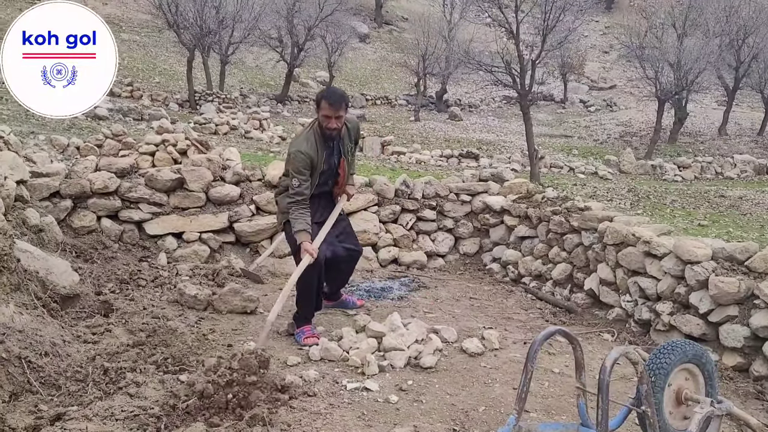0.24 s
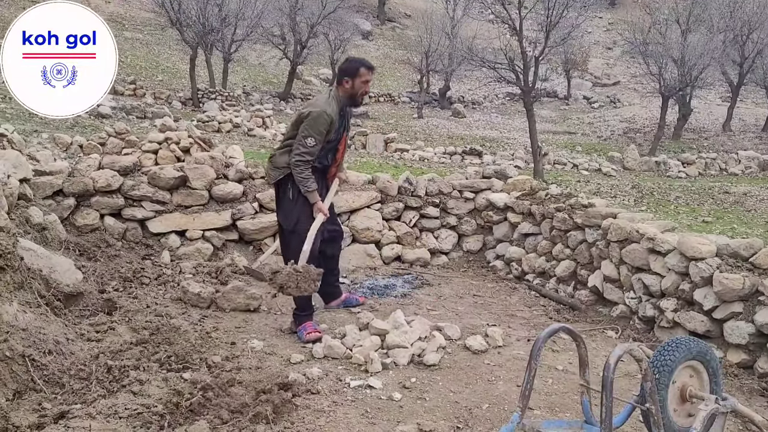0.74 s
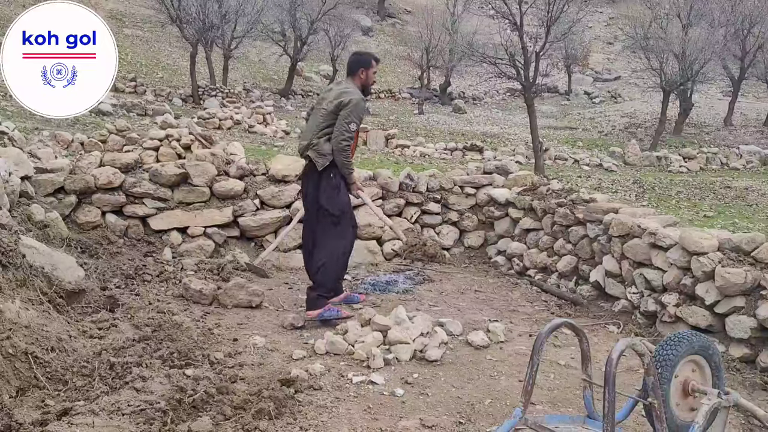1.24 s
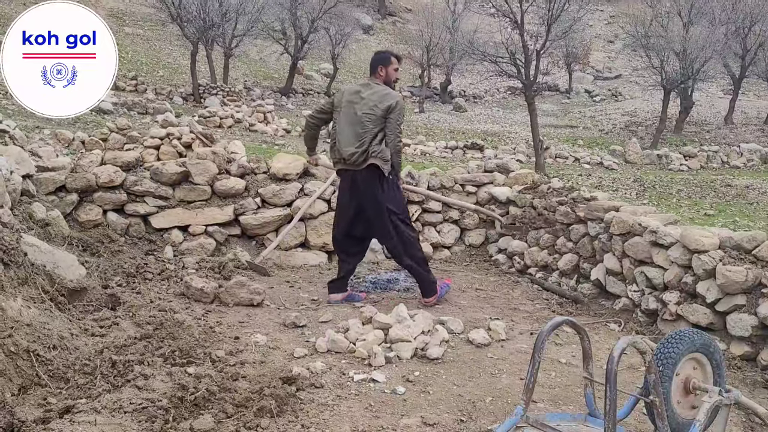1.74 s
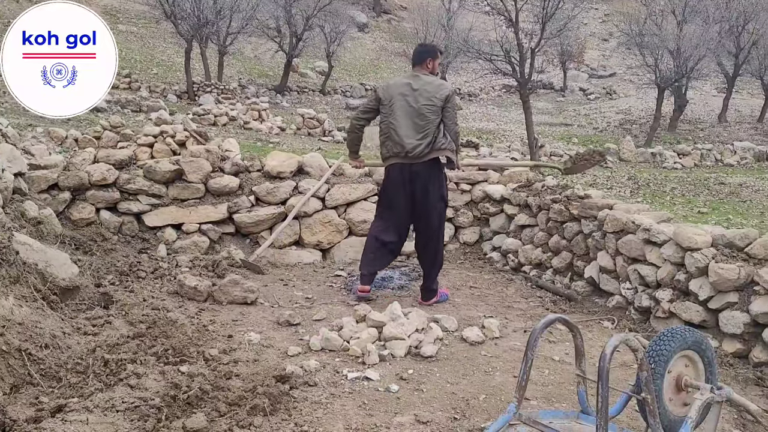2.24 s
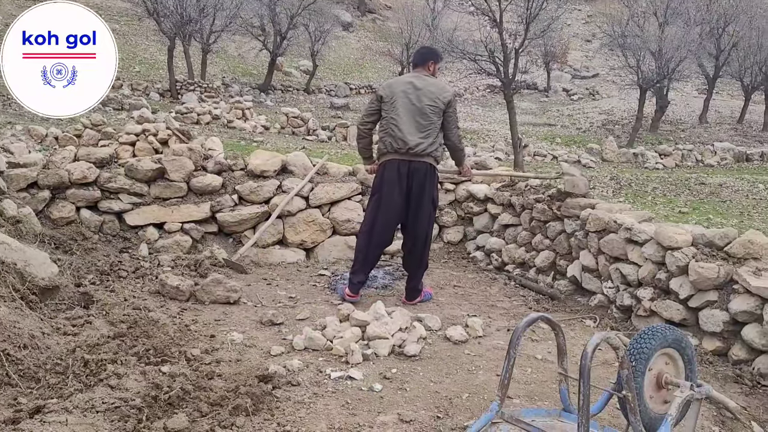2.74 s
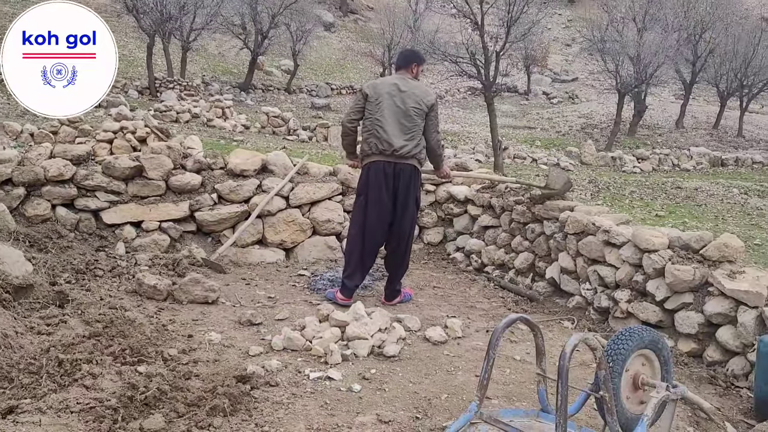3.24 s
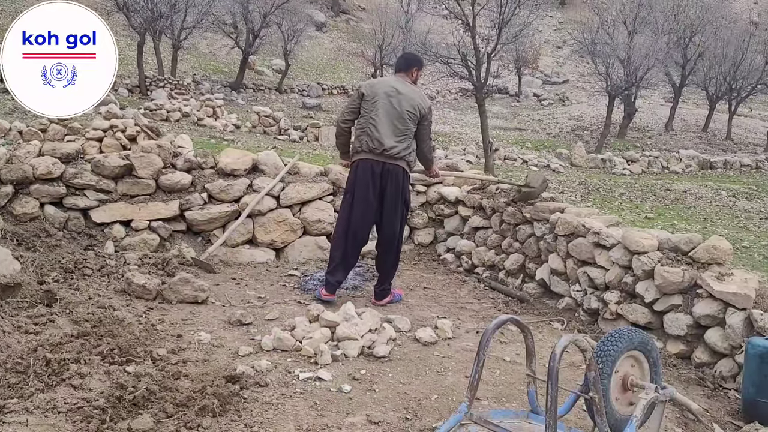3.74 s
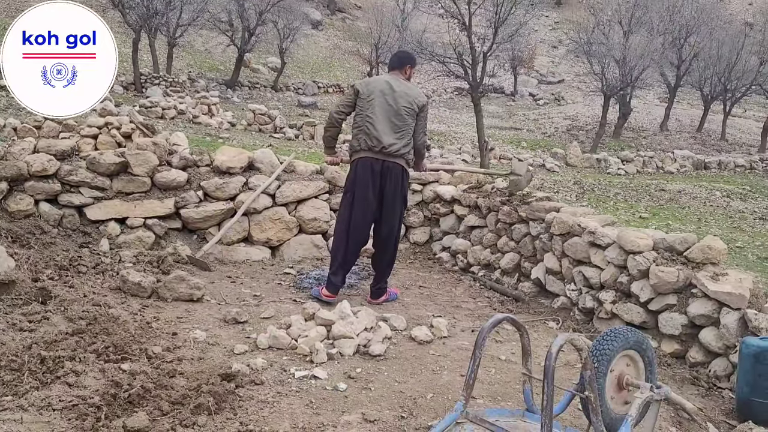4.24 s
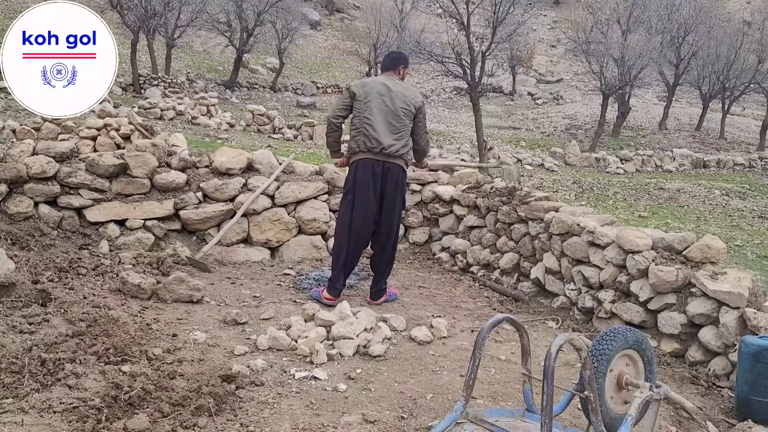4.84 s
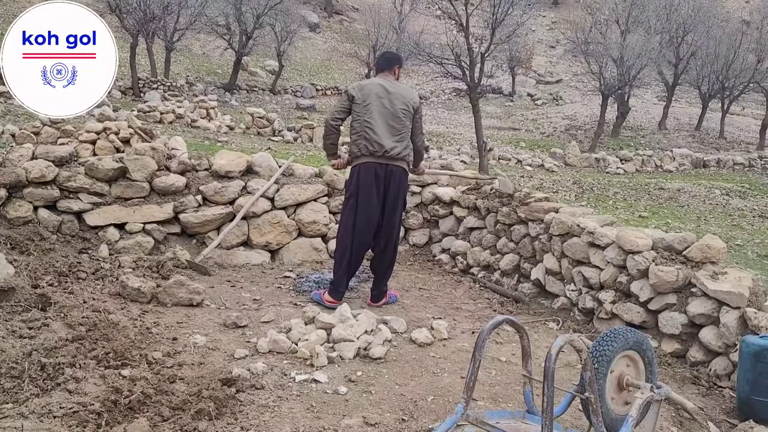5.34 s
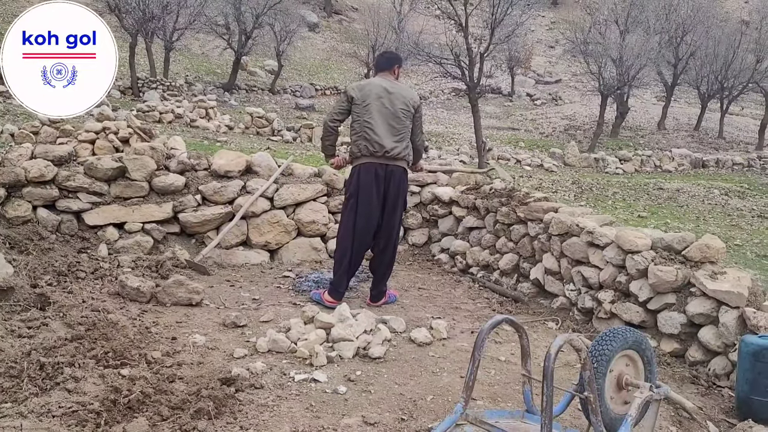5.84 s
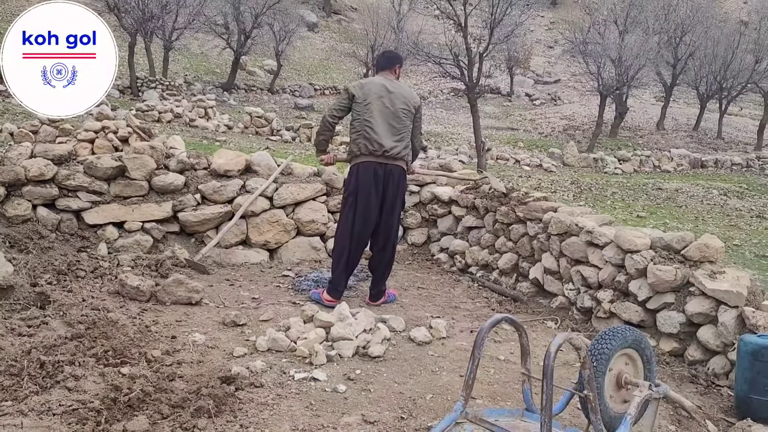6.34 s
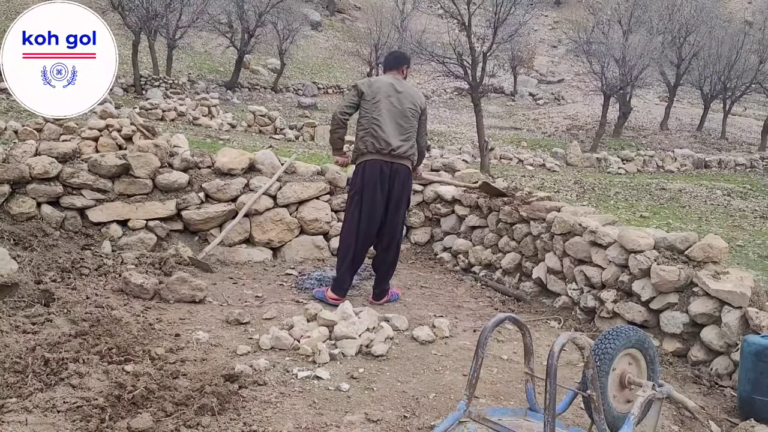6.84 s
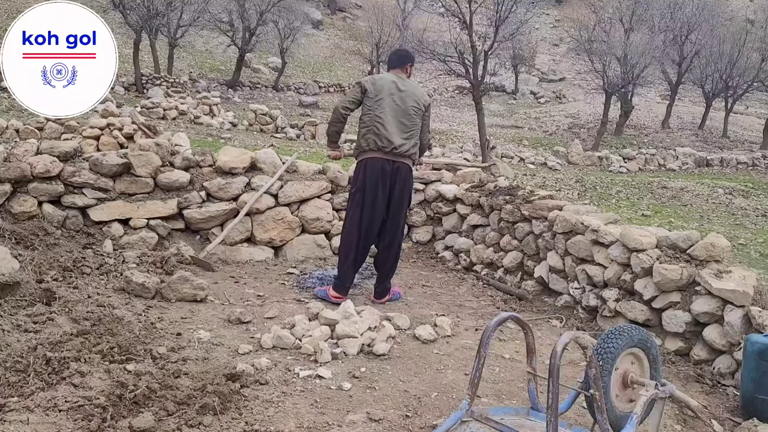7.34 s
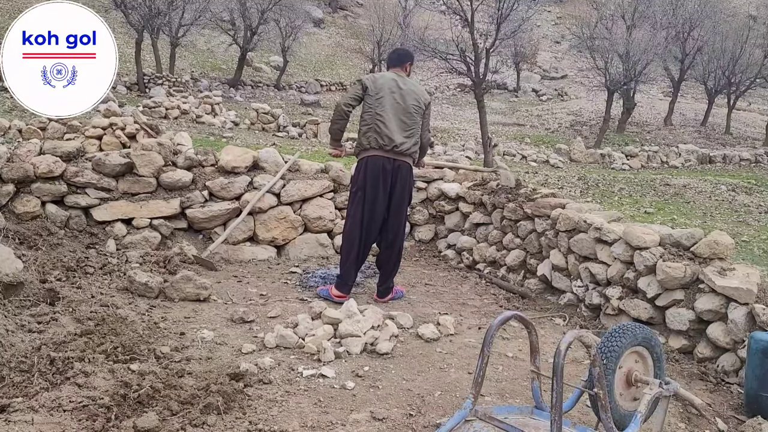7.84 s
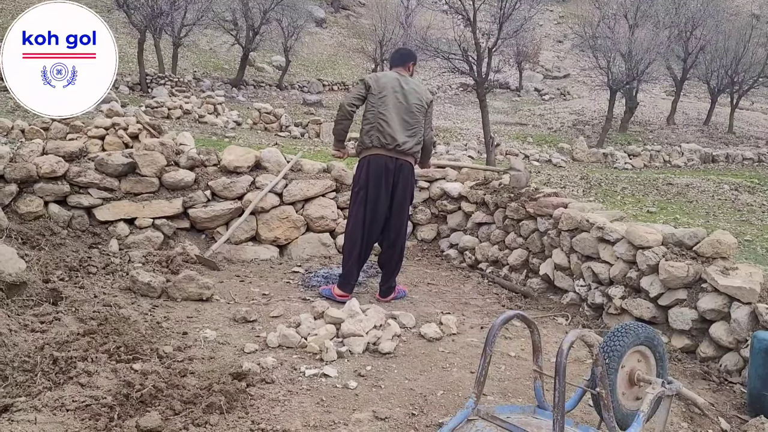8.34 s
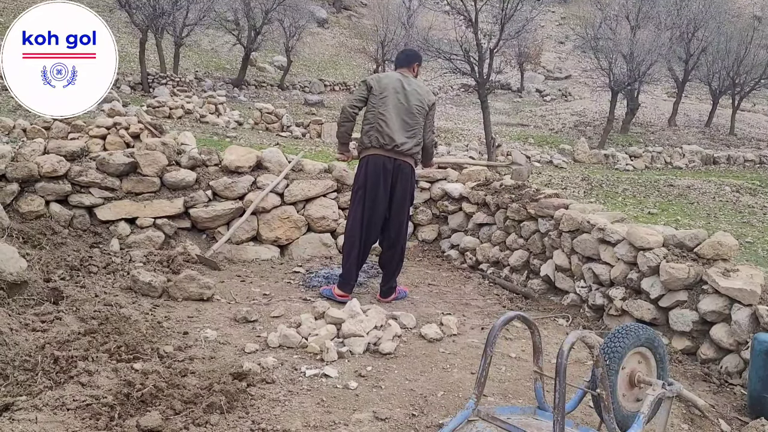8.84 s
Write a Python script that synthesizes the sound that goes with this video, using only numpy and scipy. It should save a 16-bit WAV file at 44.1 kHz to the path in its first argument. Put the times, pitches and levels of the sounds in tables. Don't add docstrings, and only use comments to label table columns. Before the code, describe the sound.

Close, dry stereo pickup of shovel work at a stone wall: low knocks and faint rustles of cloth and soil, then separate damped steel clanks with stone crunch, varying from barely audible brushes to two very loud hits. Crumbs patter after one heavy blow. Between hits it is almost quiet, with a low distant traffic drone, soft hum, light wind bumps, weak bird whistles and one faint falling hoot. Only a dull, faint echo from the slope.

```python
import sys
import numpy as np
from scipy import signal
from scipy.fft import rfft, irfft, next_fast_len
from scipy.io import wavfile

SR = 44100
rng = np.random.default_rng(int(sys.argv[2]) if len(sys.argv) > 2 else 0)


def elevation(decibels):
    levels = np.asarray(decibels, float)
    return 10 ** (levels / 20)


def dump(signal):
    limited = np.clip(np.atleast_2d(signal).T, -1, 1)
    pcm = np.round(limited * 32767).astype(np.int16)
    wavfile.write(sys.argv[1], SR, pcm)


N = 400428

# t/s, peak level/dB, then low, middle and top register against the bright one, level/dB
TIP_HITS = [
    (8.4806, -2, -3, -1, -16.5),
    (8.5528, -36, -6, -10, -16),
]
# t/s, peak level/dB, low, middle, top level/dB
FLAT_HITS = [
    (5.1701, -3.5, -3.5, 0.92, -2.5),
]
# t/s, peak level/dB, low, middle, top level/dB
HEEL_HITS = [
    (7.5678, -29, 2.5, 0.32, -6.5),
]
# t/s, peak level/dB, low, middle, top level/dB
DRAG_HITS = [
    (6.8026, -15, 5.8, 6.6, -8),
]
# t/s, peak level/dB, low, middle, top level/dB
TAP_HITS = [
    (4.546, -23.5, -3.5, -0.58, -7),
]
# t/s, peak level/dB, low, middle, top level/dB
SIDE_HITS = [
    (2.6326, -11.5, -2.6, 5.2, -5.5),
]
# t/s, peak level/dB, low, middle, top level/dB
SCRAPE_HITS = [
    (3.4517, -21.5, -10.5, -4, -8.5),
    (3.461, -31, -10.5, -5.5, -3),
    (3.473, -28.5, -6, -5, -9.5),
    (3.4794, -48, 4, -9, -8),
    (3.503, -35.5, -12, -5.5, -8),
    (3.524, -41.5, -1, -5.5, -8),
]
# t/s, peak level/dB, low, middle, top level/dB
CORNER_HITS = [
    (7.506, -28, -7.5, -1.2, -4.5),
]
# t/s, peak level/dB, low, middle, top level/dB
BRUSH_HITS = [
    (6.1147, -41, 0, 10, -1.5),
]
# t/s, peak level/dB, low, middle, top level/dB
BACK_HITS = [
    (5.682, -29, 4, 2.9, -8.5),
]

# f/Hz, level/dB, T60/s
TIP_HZ = [417, 537, 827, 947, 1160, 1562, 1717, 1987, 2159, 2310, 2433, 3051, 4170, 4400]
TIP_DB = [0.5, -14.5, -9, -5, -7, -8.5, -2.5, -9, -7, -9, -1, -9.5, -14, -13]
TIP_T60_S = [0.14, .07, 0.041, 0.062, .07, 0.0774, .09, 0.094, 0.1, 0.0792, 0.055, .09, .06, 0.1]
# f/Hz, level/dB, T60/s
FLAT_HZ = [426, 772, 924, 1029, 1179, 1455, 2170, 2438, 2900, 3530, 4170, 5850, 6590, 7400]
FLAT_DB = [0, -7.5, -1, -3.5, -7.5, -3.5, -8.5, -9, -17, -11, -13, -16, -17.5, -16.5]
FLAT_T60_S = [0.072, 0.056, 0.059, .065, 0.097, .05, .055, 0.055, .06, .06, 0.05, 0.071, 0.16, 0.022]
# f/Hz, level/dB, T60/s
DRAG_HZ = [235, 512, 765, 1021, 1600, 2121, 2250, 2400, 2545, 2922, 3597, 4132, 4470, 6120]
DRAG_DB = [-5.5, 5.5, 3, -3.5, -6, -8, -16, -14, -21, -24, -24, -22, -21, -25]
DRAG_T60_S = [0.1, 0.056, 0.055, 0.063, 0.069, 0.073, 0.1, .07, 0.11, .055, .075, 0.094, .065, .06]
# f/Hz, level/dB, T60/s
SIDE_HZ = [232, 438, 537, 814, 939, 1035, 1190, 1497, 1758, 2147, 2450, 3083, 4150, 6900]
SIDE_DB = [-11, -6.5, -11.5, -1.5, 4, 1, -3, -3, -12, -8, -10, -9, -19, -30]
SIDE_T60_S = [.08, 0.059, .07, 0.098, 0.068, .07, 0.19, 0.1, 0.068, .075, .07, 0.056, .065, .07]
# f/Hz, level/dB, T60/s
SCRAPE_HZ = [409, 802, 1120, 1790, 2280, 2450, 2640, 2920, 3310, 4040, 4950, 6340]
SCRAPE_DB = [0.5, -9, -1, -8, 0, 1.5, -4, 1, -8, -0.5, -22, -18.5]
SCRAPE_T60_S = [0.094, .06, 0.028, 0.12, 0.038, 0.026, 0.051, 0.0324, 0.052, 0.041, .04, 0.059]
# f/Hz, level/dB, T60/s
HEEL_MODES = [(228, 1.5, .09), (322, -1.5, 0.074), (425, 4, 0.064), (790, -8, 0.067), (918, -4.5, 0.11),
              (1156, -10, 0.05), (1673, 2.5, 0.1), (2140, -5, 0.082), (2515, 1, 0.061), (3420, -30, 0.052),
              (4150, -4, 0.042), (7130, -18, 0.029)]
# f/Hz, level/dB, T60/s
TAP_MODES = [(433, -10.5, 0.12), (917, 2.5, 0.037), (1460, -6.5, 0.032), (2300, -10, 0.1),
             (2400, 14.5, 0.0088), (2510, -11, 0.12), (3540, -4, 0.09), (4120, -23, .06), (5259, -20, .06),
             (6240, -22, 0.064), (7250, -39, 0.041)]
# f/Hz, level/dB, T60/s
CORNER_MODES = [(685, 1, 0.037), (921, -10, 0.1), (1503, -9, 0.069), (2000, -26, .08), (2200, -1, 0.042),
                (2370, -13, 0.056), (3600, -24.5, .06), (5410, -0.5, 0.04), (7251, -25, 0.035)]
# f/Hz, level/dB, T60/s
BRUSH_MODES = [(400, -13, .06), (1077, 2.5, 0.034), (2500, -10.5, 0.092), (3060, -8, 0.08),
               (4500, -18, .05), (5630, -8, 0.034), (7580, -16, 0.075)]
# f/Hz, level/dB, T60/s
BACK_MODES = [(228, -3, 0.077), (422, -1, 0.11), (508, -6.5, 0.085), (615, 0, 0.051), (794, -2, 0.044),
              (1182, -8.5, 0.05), (1480, -8, 0.079), (1700, -0.5, 0.027), (2145, -6.5, 0.11),
              (4240, -18, 0.086), (7320, -33, 0.047)]
# f/Hz, level/dB, T60/s
CRUNCH = [(273, -15, 0.075), (452, -11.5, 0.075), (610, -14, 0.11), (773, -9.5, 0.052), (1230, -7.5, .07),
          (1676, -10, 0.095), (2830, -9, 0.086), (3640, -3, 0.012), (5100, -22, 0.012),
          (8370, -25.5, 0.037), (12200, -27, 0.061)]
REGISTER_EDGES_HZ = [200, 600, 1500]

# t/s, peak level/dB, f/Hz
DEBRIS = [
    (5.244, -43, 3100),
    (5.257, -50, 1700),
    (5.2762, -53, 2980),
    (5.283, -55, 5500),
    (5.3, -48, 3100),
    (5.308, -51.5, 4300),
    (5.318, -50, 3220),
    (5.333, -54, 4200),
    (5.352, -60, 3600),
    (5.372, -64, 2900),
]
# t/s, peak level/dB
THUDS = [
    (2.636, -36.5),
    (5.174, -35.5),
    (5.686, -48),
    (6.808, -35),
    (8.484, -36),
]
# t/s, peak level/dB, f/Hz, T60/s, broad snap level/dB
KNOCKS = [
    (0.571, -26, 294, 0.055, -38),
    (3.137, -19.5, 1070, 0.0083, -34),
    (3.148, -43.5, 950, 0.038, -25),
    (3.657, -48, 591, 0.28, -29),
    (4.39, -52, 562, 0.28, -34),
    (4.74, -55, 644, 0.3, -38),
    (6.538, -42.5, 312, 0.13, -40),
    (8.356, -34, 459, 0.029, -33),
]
# t/s, peak level/dB, f/Hz,
# broad snap level/dB
TOUCHES = [(0.286, -59.5, 1680, -8), (0.5497, -62, 1900, 2.5), (1.227, -46, 1210, -10),
           (1.239, -60, 2400, 1), (1.685, -53, 1580, -10.5), (1.778, -56, 1660, -11),
           (1.935, -65, 1450, 4.5), (2.105, -68.5, 6600, -23.5), (2.171, -72.5, 5540, 17.5),
           (2.3494, -71, 6590, -9.5), (2.384, -63.5, 6100, -21), (2.4, -57, 1180, -0.5),
           (2.448, -64, 7700, -20), (2.46, -67, 6800, -20), (2.4846, -74.5, 2940, 21),
           (2.4846, -80, 3150, -25), (2.576, -71, 3980, -23), (2.6063, -49.5, 2140, -3),
           (2.706, -59, 3060, -6), (3.0422, -51, 1560, -10), (3.043, -58, 4000, -9.5), (3.55, -53, 2550, 0),
           (3.705, -48.5, 2060, -2), (4.085, -68, 1610, 3), (6.099, -68.5, 6900, 8), (8.069, -75, 2110, 8),
           (8.933, -58, 1540, -4.5)]
# t/s, peak level/dB, f/Hz, T60/s, broad snap level/dB
TICKS = [
    (.286, -68, 7340, .04, -14),
    (.552, -57, 11500, .025, -7),
    (.575, -54.5, 7200, 0.036, -3),
    (3.583, -65, 7000, 0.016, -2),
    (3.671, -50, 11600, 0.01, -2),
    (3.697, -66, 11600, .05, 10),
    (3.7295, -46.5, 12000, 0.029, 0.5),
]
# f/Hz, side against mid level/dB, side phase/rad
PORTS = [(120, -20, -1.9), (300, -13, -1.9), (650, -11, -1.7), (1300, -3, -2.0), (2600, -3, -1.9),
         (5000, -3.5, -1.2), (9000, 0, -1.4), (13000, 0, -1.8)]
# delay/s, level/dB, smear/s
ECHOES = [
    (0.031, -27.5, 0.022),
    (0.068, -36.5, 0.014),
    (.11, -42, .05),
    (0.159, -69, 0.03),
]

# t/s, length/s, grit level/dB, cloth level/dB
MOVES = [(0.303, 0.24, -85, -74.5), (0.464, 0.45, -86, -96), (0.6, 0.23, -77.5, -64),
         (0.726, 0.13, -94, -88), (1.146, 0.15, -81, -83), (1.24, 0.04, -84, -68), (1.76, 0.47, -80, -102),
         (1.998, 1, -98.5, -78), (2.462, 0.23, -78.5, -73), (2.697, 0.1, -100, -70),
         (3.07, 0.06, -71.5, -71), (3.251, 0.089, -71.5, -68.5), (3.332, 0.098, -79, -88),
         (3.43, 0.27, -69, -71), (3.543, 0.066, -71, -68), (3.732, 0.094, -70, -65.5),
         (4.22, 0.87, -89, -81.5), (4.36, 0.093, -88, -78.5), (4.551, 0.061, -52.5, -61),
         (5.286, 0.13, -81, -76.5), (5.34, 0.19, -68.5, -83.5), (6.12, 0.39, -94, -84),
         (7.537, 0.34, -85, -92), (8.067, 0.14, -80.5, -78), (8.564, 0.23, -79, -91),
         (8.947, 0.2, -101, -83)]
# f/Hz, level/dB per Hz
GRIT = [(1180, -32), (2000, 0), (3040, 1), (3460, -10.5), (4020, -3), (6000, -20.5), (7800, -51),
        (13200, -120)]
# f/Hz, level/dB per Hz
CLOTH = [(2940, -40), (4600, -17.5), (5800, -7.5), (6900, 0), (7800, -5.5), (9000, -14.5), (10400, -4.5),
         (12000, -3), (15200, -6.5), (16000, -12)]
# t/s, length/s, level/dB, left-right level/dB
GUSTS = [(0.658, 0.25, -69, -4), (0.885, 0.11, -48.5, 37), (1.067, 0.19, -69, -11), (1.257, 0.21, -92, 2),
         (1.58, 0.063, -52.5, 24), (1.834, 0.062, -74, 9), (2.04, 0.049, -51, 14), (2.403, 0.22, -76, 4),
         (6.192, 0.057, -72, -9), (7.194, 0.084, -60.5, -22), (7.27, 0.16, -59, -16), (7.587, 0.13, -72, 6),
         (7.714, 0.039, -43.5, -33), (7.808, 0.099, -43, -30.5), (7.926, 0.029, -54.5, -22),
         (8.19, 0.066, -69, 5), (8.693, 0.077, -68.5, -4), (9.07, 0.18, -75, -5.5)]
# start t/s, end t/s, first f/Hz, last f/Hz, level/dB
NOTES = [(1.535, 1.612, 3540, 3580, -87), (1.994, 2.083, 3570, 3540, -89), (2.48, 2.552, 3560, 3400, -80),
         (3.84, 3.959, 2670, 3100, -89), (3.955, 4.06, 2300, 3000, -82), (4.185, 4.268, 3570, 3550, -86),
         (4.415, 4.535, 2660, 3150, -86), (3.778, 3.8, 2800, 2150, -65.5), (4.17, 4.19, 4500, 3600, -75),
         (3.965, 3.995, 3300, 4600, -78), (4.318, 4.338, 4500, 3600, -75), (4.462, 4.482, 4500, 3700, -76),
         (0.2, 0.219, 4270, 3570, -81), (0.322, 0.35, 4400, 3500, -76), (1.1, 1.144, 4160, 3500, -87),
         (1.472, 1.5, 3220, 3170, -67.5), (1.499, 1.52, 2660, 2400, -65.5), (3.766, 3.793, 4880, 3800, -78),
         (3.74, 3.81, 3520, 3620, -84), (3.765, 3.785, 2800, 3350, -72), (1.465, 1.506, 6700, 6300, -80),
         (4.688, 4.758, 3570, 3580, -85), (5.41, 5.57, 3150, 3000, -89)]
# t/s, f/Hz, level/dB
HOOT = [
    (5.271, 390, -50),
    (5.297, 360, -54.5),
    (5.318, 329, -46),
    (5.38, 270, -55),
    (5.42, 262.5, -45),
    (5.471, 242, -63),
]
# t/s, length/s, rush level/dB, high hum level/dB
PASSES = [(0.505, .25, -78, -82), (0.653, 0.42, -79, -62.5), (1.799, 0.35, -79, -69),
          (2.447, 0.17, -76, -96), (3.1, 0.81, -76.5, -90.5), (3.605, 0.68, -77, -91.5),
          (4.55, 0.34, -75.5, -95), (5.449, .4, -79, -90.5), (7.608, 0.37, -81.5, -85.5),
          (8.621, 0.19, -69, -81), (8.81, 0.43, -75, -82.5), (8.992, .8, -73, -67)]
# t/s, length/s, level/dB
HUM_SWELLS = [(0.01, 1.1, -64), (.78, 1.17, -67.5), (2.22, 0.93, -70.5), (3.56, 0.68, -65),
              (4.47, 0.65, -67), (5.31, 1.12, -73), (6.0, 1.4, -73.5), (6.9, 1.4, -73), (7.74, 0.43, -63.5),
              (8.3, 1.1, -79.5)]
# t/s, level/dB
VALLEY = [
    (0.0, -63.5),
    (7.89, -65),
    (9.08, -64),
]
# f/Hz, level/dB per Hz
FAR_DRONE = [(21, -43), (36, -18), (60, -12), (96, -7), (213, -0.5), (327, 0), (369, -4), (725, -15.5),
             (912, -12.5), (1000, -15), (1220, -28), (1400, -33), (1820, -63), (3080, -120)]
# f/Hz, level/dB per Hz
RUSH = [(710, -42.5), (1200, -3), (1370, -10), (1540, -2), (1940, 5), (2600, -13), (3000, -31.5),
        (4160, -55.5), (7040, -120)]
# f/Hz, left-right likeness/1
LIKENESS = [(60, 1), (130, 1), (290, 0.77), (640, 0.41), (1410, 0.13), (3100, 0.23), (6820, 0.43),
            (15000, 0.8)]


def steel_ring(t, modes):
    settled = np.maximum(t - .04, 0)
    chance = rng.standard_normal((len(modes), 2))
    ring = np.zeros(len(t))
    for (hz, level_db, t60), (level_chance, pitch_chance) in zip(modes, chance):
        decay_db = 60 * (t + .8 * settled) / min(t60, .1)
        tone = np.sin(2 * np.pi * hz * (1 + 0.00053 * pitch_chance) * t)
        ring += elevation(level_db + 0.88 * level_chance - decay_db) * tone
    return ring


def stone_crunch(t, white, crunch_db, grind_s):
    slowed = 0.3 * t + 1.6 * np.maximum(t - grind_s, 0)
    first_crack = elevation(crunch_db - 12.5 - 60 * t / 0.0087) * band(white, 1100, 17000)
    crunch = first_crack
    for hz, level_db, t60 in CRUNCH:
        grinding = rms_one(band(white, hz / 1.27, hz * 1.27))
        crunch = crunch + elevation(crunch_db + level_db - 60 * slowed / t60) * grinding
    return crunch


def earth_spray(t, white, spray_db):
    clusters = signal.lfilter([1], [1, -.99], (np.abs(white) > 2.75) * 1.0)
    grains = rms_one(band(white[::-1] * (.5 + clusters), 1600, 6000))
    return elevation(spray_db - 60 * t / 0.41) * np.minimum(t / 0.018, 1) * (1 - 4 * t) * grains


def blade(blows, modes, air_db, crunch_db, chatter, grind_s, edge_hz, dull_hz, spray_db, push_db, rise_s):
    out, t = np.zeros(N), np.arange(SR // 4) / SR
    edges = REGISTER_EDGES_HZ + [edge_hz, 7500, 12800]
    for s, peak_db, low_db, middle_db, top_db in blows:
        white = rng.standard_normal(len(t))
        ring = steel_ring(t, modes)
        ring = ring + chatter * np.interp(t - .0062, t, ring)
        sound = ring + stone_crunch(t, white, crunch_db, grind_s)
        sound = sound * np.minimum(t / max(rise_s, .0002), 1)
        shares_db = (low_db, middle_db, 0, top_db, top_db + air_db)
        sound = sum(elevation(share_db) * rms_one(band(sound, low_hz, high_hz))
                    for share_db, low_hz, high_hz in zip(shares_db, edges, edges[1:]))
        sound = signal.lfilter([1], [1, -np.exp(-2 * np.pi * dull_hz / SR)], sound)
        first_push = np.sin(2 * np.pi * np.minimum(t / .0005, 1))
        sound = sound / np.abs(sound).max() + elevation(push_db) * first_push
        sound = sound + earth_spray(t, white, spray_db)
        add(out, elevation(peak_db) * sound / np.abs(sound).max(), s + 0.0015)
    return out


def all_blows():
    tip = np.transpose([TIP_HZ, TIP_DB, TIP_T60_S])
    flat = np.transpose([FLAT_HZ, FLAT_DB, FLAT_T60_S])
    side = np.transpose([SIDE_HZ, SIDE_DB, SIDE_T60_S])
    scrape = np.transpose([SCRAPE_HZ, SCRAPE_DB, SCRAPE_T60_S])
    drag = np.transpose([DRAG_HZ, DRAG_DB, DRAG_T60_S])
    blows = blade(TIP_HITS, tip, air_db=0.0, crunch_db=0.0, chatter=0.053, grind_s=0.022,
                  edge_hz=2440, dull_hz=7885, spray_db=-58, push_db=1.0, rise_s=0.00039)
    blows += blade(FLAT_HITS, flat, air_db=-2.5, crunch_db=-1.2, chatter=0.3, grind_s=0.011,
                   edge_hz=3700, dull_hz=7060, spray_db=-43.5, push_db=-4.0, rise_s=0.00068)
    blows += blade(HEEL_HITS, HEEL_MODES, air_db=-0.27, crunch_db=1.7, chatter=0.37, grind_s=0.011,
                   edge_hz=3700, dull_hz=13500, spray_db=-44, push_db=-38, rise_s=0.0056)
    blows += blade(SIDE_HITS, side, air_db=-9.0, crunch_db=-5.5, chatter=0.13, grind_s=0.018,
                   edge_hz=2650, dull_hz=13500, spray_db=-50.5, push_db=2.0, rise_s=0.00068)
    blows += blade(SCRAPE_HITS, scrape, air_db=-3.0, crunch_db=0.0, chatter=0.12, grind_s=0.015,
                   edge_hz=3980, dull_hz=8970, spray_db=-41.5, push_db=-1.5, rise_s=0.00038)
    blows += blade(DRAG_HITS, drag, air_db=-3.5, crunch_db=-8.0, chatter=0.14, grind_s=0.025,
                   edge_hz=3650, dull_hz=15130, spray_db=-50.0, push_db=-22, rise_s=0.0031)
    blows += blade(TAP_HITS, TAP_MODES, air_db=-3.4, crunch_db=-0.6, chatter=0.23, grind_s=0.018,
                   edge_hz=2620, dull_hz=15000, spray_db=-39, push_db=-29, rise_s=0.00046)
    blows += blade(CORNER_HITS, CORNER_MODES, air_db=-5.0, crunch_db=-1.6, chatter=0.85, grind_s=0.012,
                   edge_hz=2630, dull_hz=12000, spray_db=-40, push_db=-23, rise_s=0.0016)
    blows += blade(BRUSH_HITS, BRUSH_MODES, air_db=-5.5, crunch_db=-2.0, chatter=0.23, grind_s=0.029,
                   edge_hz=3200, dull_hz=12000, spray_db=-38, push_db=-14, rise_s=0.00079)
    blows += blade(BACK_HITS, BACK_MODES, air_db=-1.5, crunch_db=-5.5, chatter=0.59, grind_s=0.024,
                   edge_hz=3560, dull_hz=12900, spray_db=-43, push_db=-30, rise_s=0.0024)
    return blows


def small_hits(rows, width):
    out, t = np.zeros(N), np.arange(SR // 8) / SR
    for s, peak_db, hz, t60, snap_db in rows:
        white = rng.standard_normal(len(t))
        tone = rms_one(band(white, hz / width, hz * width))
        snap = elevation(snap_db) * rms_one(band(white, 800, 24000))
        decay = elevation(peak_db - 4 - 60 * t / max(t60, .004))
        add(out, decay * (tone + snap) * np.minimum(t / 0.0025, 1), s)
    return out


def touches_and_falls():
    touches = [(s, peak_db, hz, 0.042, snap_db) for s, peak_db, hz, snap_db in TOUCHES]
    thuds = [(s, peak_db, 61.94, 0.28, -60) for s, peak_db in THUDS]
    debris = [(s, peak_db - 4.5, hz, 0.038, -19) for s, peak_db, hz in DEBRIS]
    hits = small_hits(touches, 1.36) + small_hits(KNOCKS, 1.086) + small_hits(thuds, 9.9)
    return hits + small_hits(debris, 1.1) + small_hits(TICKS, 1.1)


def near_ports(x):
    size = next_fast_len(N)
    hz = np.maximum(np.fft.rfftfreq(size, 1 / SR), 1)
    hzs, side_db, phase = np.transpose(PORTS)
    turned = np.exp(1j * at_hz(hzs, phase, hz))
    side = irfft(rfft(x, size) * elevation(at_hz(hzs, side_db, hz)) * turned, size)[:N]
    return np.array([x + side, x - side])


def slope_echo(x):
    t = np.arange(SR // 3) / SR
    shape = np.zeros(len(t))
    for lag, level_db, smear in ECHOES:
        tail = (t > lag) * np.exp(-np.maximum(t - lag, 0) / smear)
        shape += elevation(level_db) * tail / np.sqrt(smear * SR / 2)
    answer = band(shape * rng.standard_normal((2, len(t))), 500, 13000)
    uneven = x * (0.33 + drift(150))
    return signal.fftconvolve(uneven[None], answer, axes=1)[:, :N]


def rustle():
    s, length, grit_db, cloth_db = np.transpose(MOVES)
    grains = (rng.random(N) < 400 / SR) * rng.exponential(1, N)
    lumps = 1.4 + 0.47 * signal.lfilter([1], [1, -.99], grains)
    grit = rms_one(lumps * banded_noise(GRIT, 3, count=4))
    cloth = elevation(-6.5 + 1.5 * drift(25)) * banded_noise(CLOTH, 1.4, count=8)
    grit = swells(s, length, grit_db, -95, rise=0.34) * grit
    return grit + swells(s, length, cloth_db, -99, rise=0.65) * cloth


def wind():
    s, length, level_db, pan_db = np.transpose(GUSTS)
    left, right = band(rng.standard_normal((2, N)), 27, 105)
    ports = rms_one(np.array([left, right + 0.51 * left])) * elevation(3 * drift(25))
    shares_db = [20 * np.log10(2 / (1 + elevation(side * pan_db))) for side in (-1, 1)]
    return ports * [swells(s, length, level_db + share_db, -73, rise=0.95) for share_db in shares_db]


def birds():
    out, waver = np.zeros(N), drift(300)
    for start, end, first_hz, last_hz, level_db in NOTES:
        u = np.linspace(0, 1, round((end - start) * SR))
        glide_hz = first_hz + (last_hz - first_hz) * u ** 0.85
        roughness = 0.00002 / (end - start) ** 2
        hz = glide_hz * (1 + roughness * waver[round(start * SR):][:len(u)])
        tone = np.sin(2 * np.pi * np.cumsum(hz) / SR)
        add(out, elevation(level_db + 0.5) * np.sin(np.pi * u) ** 0.24 * tone, start)
    return out * elevation(3.5 * drift(30) - 2.5)


def hoot():
    hz, level_db = in_time(HOOT)
    t = np.arange(N) / SR
    gate = np.clip(np.minimum(t - HOOT[0][0], HOOT[-1][0] - t) / 0.034, 0, 1)
    return np.sqrt(2) * elevation(level_db) * gate * np.sin(2 * np.pi * np.cumsum(hz) / SR)


def hums():
    s, length, _, high_db = np.transpose(PASSES)
    white = rng.standard_normal((2, N)) + 1.1 * rng.standard_normal(N)
    low = elevation(1.2 * drift(11)) * rms_one(band(white, 1020 / 1.04, 1020 * 1.04))
    high = rms_one(band(white, 1540 / 1.07, 1540 * 1.07))
    low = swells(*np.transpose(HUM_SWELLS), -88, rise=0.73) * low
    return low + swells(s, 2.3 * length, high_db - 11.0, -96, rise=0.61) * high


def valley():
    drone_db, = in_time(VALLEY)
    s, length, rush_db, _ = np.transpose(PASSES)
    drone = elevation(drone_db + 5.5) * banded_noise(FAR_DRONE, 2.2, count=16)
    return drone + swells(s, length, rush_db - 1.5, -100, rise=0.33) * banded_noise(RUSH, 1.6, count=4)


def hiss():
    return elevation(-87) * rms_one(band(rng.standard_normal((2, N)), 5400, 22000))


def banded_noise(spectrum, patchy_db, count):
    hzs, levels = np.transpose(spectrum[1:-1])
    edges, out = np.geomspace(hzs[0], hzs[-1], count + 1), 0
    white = rng.standard_normal((2, 2, N))
    for k, (low, high) in enumerate(zip(edges, edges[1:])):
        mid, side = band(white[k % 2], low, high)
        hz = np.sqrt(low * high)
        alike = np.clip(at_hz(*np.transpose(LIKENESS), hz), -1, 1)
        gain = elevation(at_hz(hzs, levels, hz) + patchy_db * drift(43))
        out = out + gain * (np.sqrt(1 + alike) * mid + np.sqrt(1 - alike) * side * [[1], [-1]])
    return rms_one(out)


def swells(s, length, level_db, rest_db, rise):
    t = np.arange(0, N + 64, 64)[:, None] / SR - s
    away = np.maximum(t, -t / rise) / np.maximum(length, .02)
    gain = elevation(rest_db) + elevation(level_db - 20 * away).sum(axis=1)
    return np.interp(np.arange(N) / 64, np.arange(len(t)), gain)


def drift(rate):
    r = np.exp(-80 * np.pi * rate / SR)
    slow = signal.lfilter([1], [1, -2 * r, r * r], rng.standard_normal(N // 40 + 2002))[2000:]
    return np.interp(np.arange(N) / 40, np.arange(len(slow)), rms_one(slow))


def band(x, low_hz, high_hz):
    sos = signal.butter(2, [low_hz, min(high_hz, SR / 2.2)], "band", fs=SR, output="sos")
    return signal.sosfilt(sos, x)


def rms_one(x):
    return x / np.sqrt(np.mean(x ** 2) + 1e-20)


def in_time(rows):
    s, *columns = np.transpose(rows)
    return [np.interp(np.arange(N) / SR, s, column) for column in columns]


def at_hz(hzs, values, hz):
    return np.interp(np.log(hz), np.log(hzs), values)


def add(out, sound, s):
    i = round(s * SR)
    out[..., i:i + sound.shape[-1]] += sound[..., :out.shape[-1] - i]


def scene():
    blows = all_blows()
    near = near_ports(blows + touches_and_falls())
    around = slope_echo(blows) + rustle() + wind() + birds() + hoot() + hums() + valley() + hiss()
    return near + around


def band_limit(x):
    return signal.sosfilt(signal.butter(12, 16810, fs=SR, output="sos"), x)


def record(dry):
    dry = signal.sosfilt(signal.butter(2, 32, "high", fs=SR, output="sos"), dry)
    dry = signal.sosfilt(signal.cheby2(10, 50, 16300, fs=SR, output="sos"), dry)
    mix = np.clip(dry, -.99, .99)
    return band_limit(mix)


dry = scene()
out = record(dry)
dump(out)
```